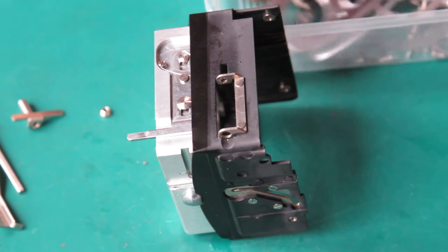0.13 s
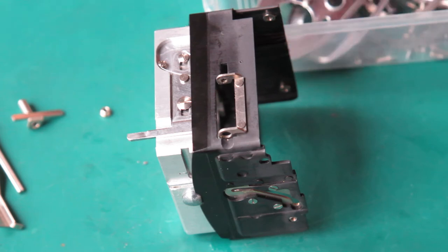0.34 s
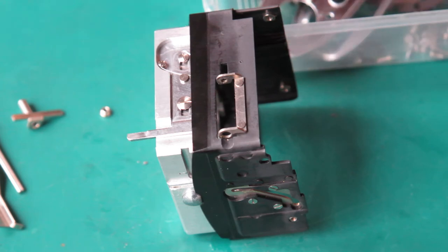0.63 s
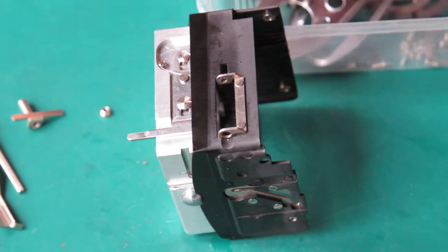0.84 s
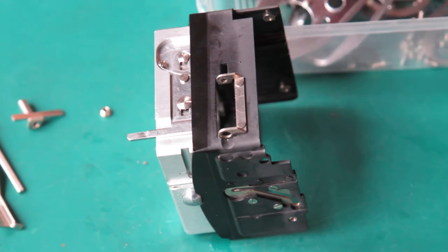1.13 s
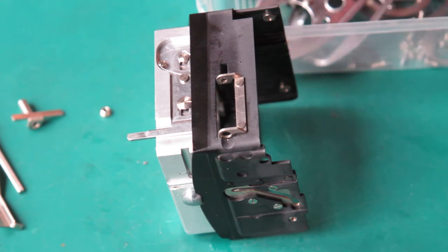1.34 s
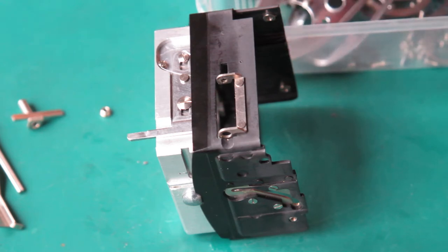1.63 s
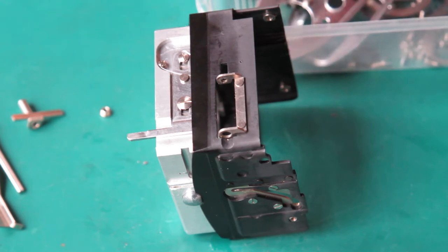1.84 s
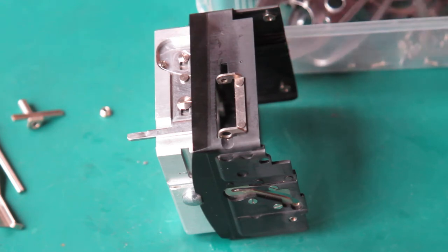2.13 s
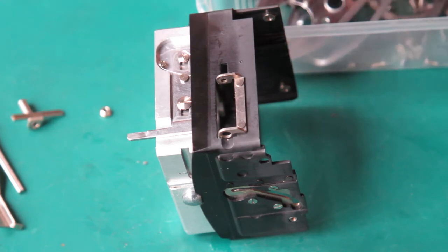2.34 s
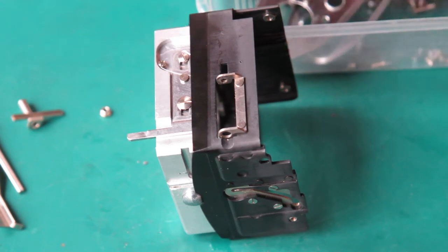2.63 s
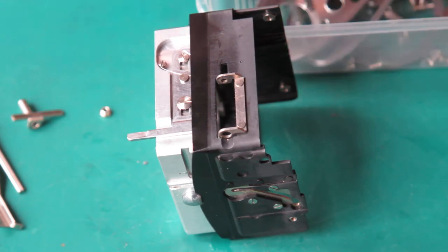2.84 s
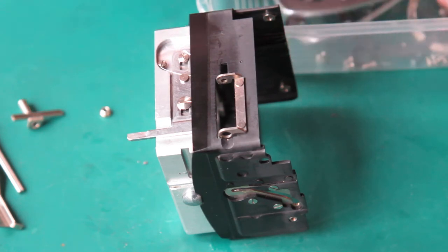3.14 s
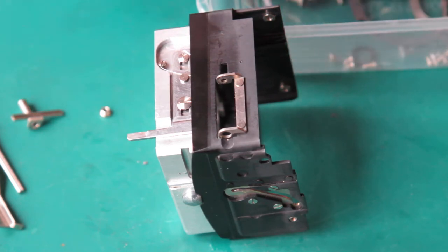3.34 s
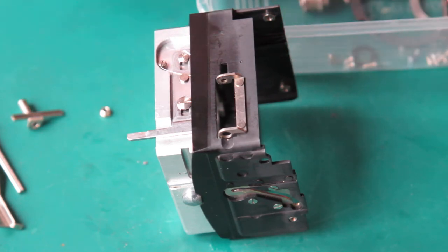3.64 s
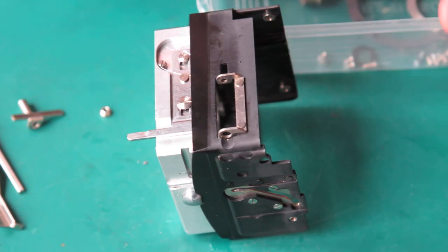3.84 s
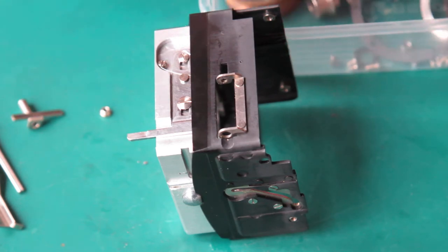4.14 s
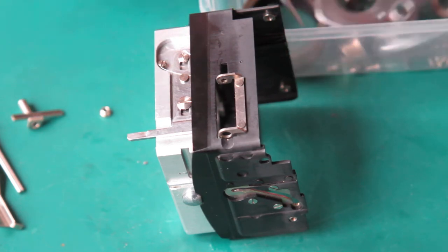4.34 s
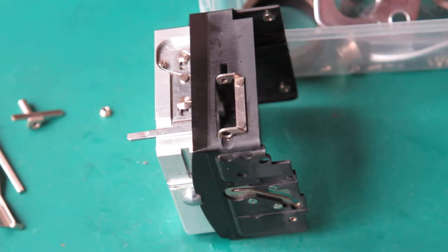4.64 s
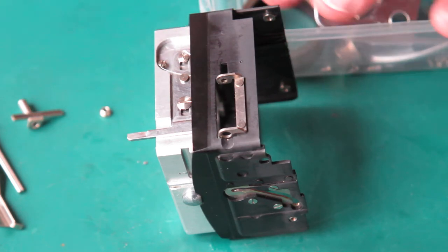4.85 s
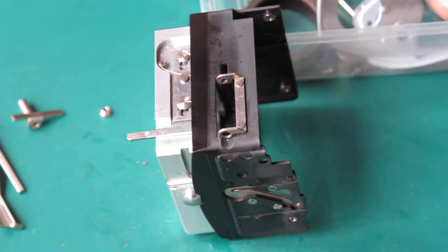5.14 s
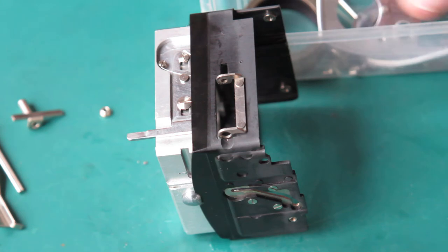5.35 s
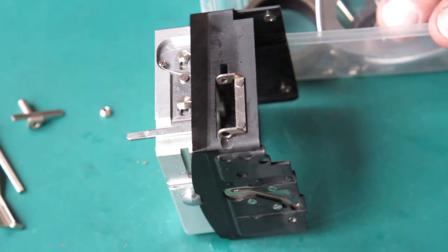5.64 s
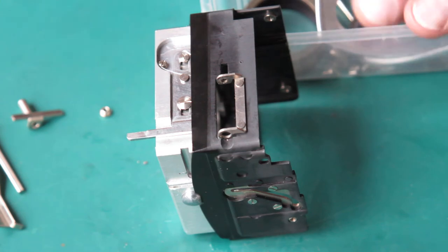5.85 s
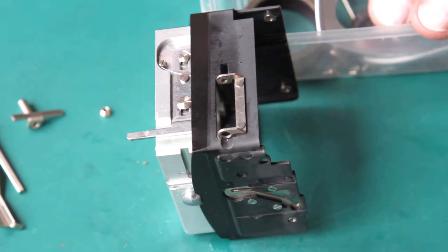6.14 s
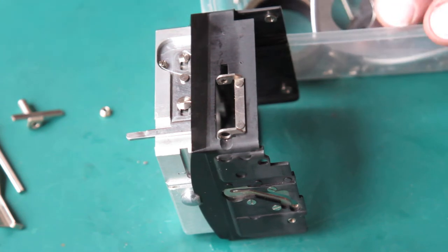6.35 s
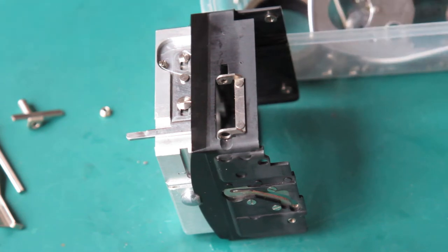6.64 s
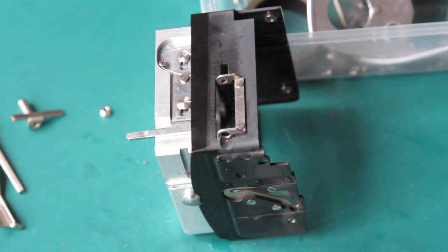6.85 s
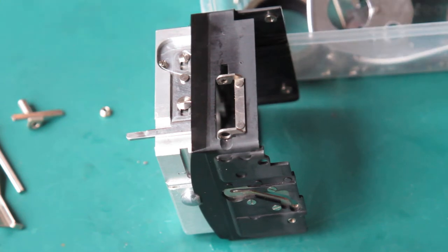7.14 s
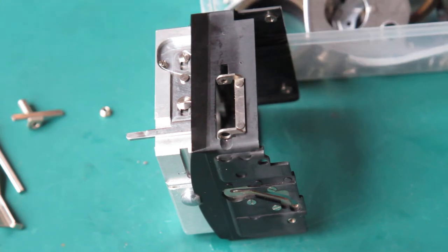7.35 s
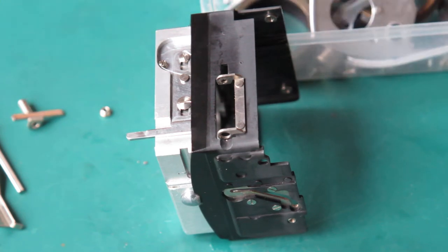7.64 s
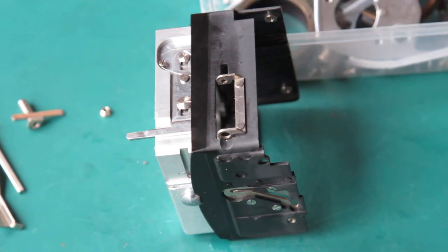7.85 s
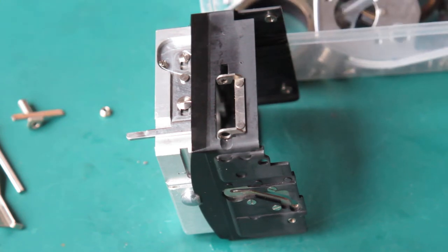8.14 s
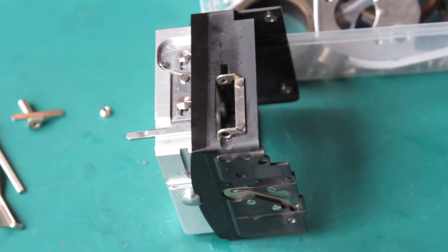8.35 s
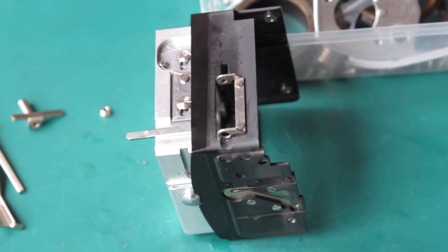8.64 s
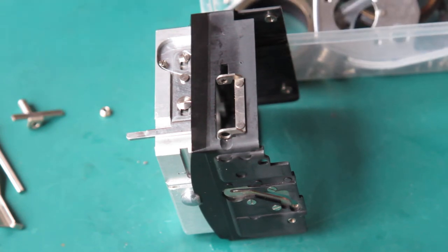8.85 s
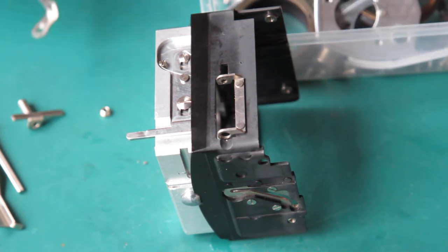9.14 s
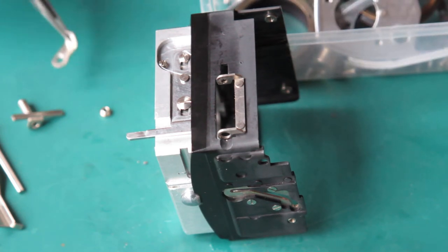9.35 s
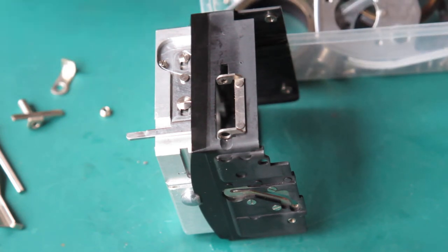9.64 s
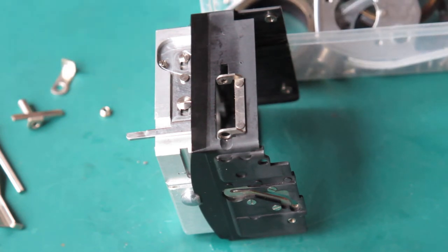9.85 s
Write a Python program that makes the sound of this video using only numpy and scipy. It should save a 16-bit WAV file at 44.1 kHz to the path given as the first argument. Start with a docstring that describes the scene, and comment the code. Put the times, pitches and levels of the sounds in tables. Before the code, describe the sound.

Small metal hardware is sorted by hand in a plastic tray on a workbench, picked up closely in stereo. Irregular bouts of crisp clinking and chattering are broken by short gaps, hard single clacks and hollow tray thumps. Later come a couple of strong rakes, then sparse ticks and soft scrapes. Finally a barely audible whistle leads to a tiny metal part dropping, its bounces deadened at once. Low room rush throughout, with short dense reflections.

```python
"""Fingers rummage through screws, washers and stamped metal parts in a plastic tray; a low hum wavers
throughout. From the start the heap rattles in bouts of random touches, over single clacks and the short modes
of struck parts. Later a few soft scrapes of rough noise swell and fade, the last near 9 s; the stray ticks stop
at 9.3 s. A small lug then rings with a thin gliding tone as it falls, and lands on the bench mat: three quick,
damped noise bursts. A small room adds dense echoes to everything but the hum."""
import sys
import numpy as np
from scipy import signal
from scipy.fft import rfft, irfft, next_fast_len
from scipy.io import wavfile
from scipy.ndimage import uniform_filter1d

SR = 44100
rng = np.random.default_rng(int(sys.argv[2]) if len(sys.argv) > 2 else 0)


def file_out(sig):
    """Save sig as 16-bit WAV at sys.argv[1]."""
    # one column per channel
    cols = np.atleast_2d(sig).T
    # limit, then scale
    lim = np.clip(cols, -1, 1)
    pcm = np.round(lim * 32767).astype(np.int16)
    wavfile.write(sys.argv[1], SR, pcm)


N = 440118
TIME = np.arange(N) / SR   # s

# common colour of the metal parts: (frequency [Hz], relative level [dB])
METAL_COLOUR = [(900, -35), (1550, -6.5), (1900, -18.5), (2600, -14), (3500, -1), (4600, -1.5), (6000, 1),
                (7100, 4.5), (8000, -2), (9500, -10), (12000, -19), (14000, -31.5), (16000, -51.5)]


def from_db(db):
    """Turn decibels into an amplitude factor."""
    return 10 ** (np.asarray(db) / 20)


def rms_one(x):
    """Scale a signal to an RMS of 1."""
    return x / np.sqrt(np.mean(x ** 2) + 1e-20)


def energy_one(x):
    """Scale each channel to a summed energy of 1."""
    return x / np.sqrt(np.sum(x ** 2, axis=-1, keepdims=True) + 1e-20)


def add(out, s, sound):
    """Mix a sound in at time s."""
    at = min(max(round(s * SR), 0), N - 1)
    out[..., at:at + sound.shape[-1]] += sound[..., :N - at]


def convolve(x, response):
    """Filter each channel with an impulse response, cut to the scene's length."""
    return signal.oaconvolve(np.atleast_2d(x), np.atleast_2d(response), axes=-1)[:, :N]


def colour(points, size=4096):
    """Causal (minimum-phase) impulse response with the given spectrum."""
    hz, db = np.transpose(points)
    grid = np.maximum(np.arange(size // 2 + 1) * SR / size, 1)
    spectrum_db = np.interp(np.log(grid), np.log(hz), db)
    # folding the cepstrum forward in time makes the response causal
    cepstrum = irfft(np.log(from_db(spectrum_db)))
    cepstrum[1:size // 2] *= 2
    cepstrum[size // 2 + 1:] = 0
    return irfft(np.exp(rfft(cepstrum)))[:size // 2]


def stereo_noise(side_db, size):
    """White noise in the middle, plus side noise with opposite signs left and right."""
    mid, side = rng.standard_normal((2, size))
    return mid + from_db(side_db) * side * np.array([[1], [-1]])


def contact(t60, side_db, size=3000):
    """One touch: a crowd of close modes, heard as noise, that all die away together; energy 1."""
    decay = from_db(-60 * TIME[:size] / t60)
    return energy_one(stereo_noise(side_db, size) * decay)


def touch(t60, ring_db, count=7, size=2000):
    """Metal meets metal: a crack plus a few short modes that belong to this one part; energy 1."""
    part_colour_db = 4.5   # typical random departure from the common metal colour
    t = TIME[:size]
    hz = rng.uniform(1400, 13000, (count, 1, 1))
    # each mode's phase differs between left and right
    phase = 2 * np.pi * rng.random((count, 1, 1)) + 0.71 * rng.standard_normal((count, 2, 1))
    life = .028 * 2 ** rng.uniform(-1, 1, (count, 1, 1))   # t60 of each mode, s
    modes = np.sum(from_db(-60 * t / life) * np.sin(2 * np.pi * hz * t + phase), axis=0)
    blow = contact(t60, side_db=-8.0, size=size) + from_db(ring_db) * energy_one(modes)
    points = [(f, db + part_colour_db * rng.standard_normal()) for f, db in METAL_COLOUR]
    own_colour = colour(points, size=512)
    return energy_one(signal.fftconvolve(blow, own_colour[None], axes=-1)[:, :size])


def pushing(times):
    """How hard the heap is stirred: every push swells, sags as the fingers ease off, then settles."""
    # finger movements: (start [s], kind, length [s], rattle level [dB] before sag and mix)
    pushes = [(0.002, "jab", 0.26, -31.5), (0.057, "push", 0.14, -26), (0.313, "push", 0.15, -31),
              (0.756, "push", 0.13, -31), (1.354, "push", 0.034, -30), (1.495, "jab", 0.036, -37),
              (1.686, "push", 0.073, -31.5), (2.089, "jab", .13, -28.5), (2.236, "jab", 0.13, -40),
              (2.433, "rake", 0.14, -28), (2.582, "jab", 0.16, -32.5), (2.862, "push", 0.37, -28.5),
              (3.132, "jab", 0.19, -34.5), (3.535, "rake", 0.13, -31), (3.723, "push", 0.15, -36),
              (3.89, "jab", 0.12, -32), (4.064, "push", 0.3, -33), (4.303, "jab", 0.14, -25.5),
              (4.698, "jab", 0.31, -34.5), (5.04, "jab", 0.33, -42.5), (5.155, "jab", 0.02, -26),
              (5.395, "rake", 0.15, -31), (5.793, "jab", 0.19, -37.5), (5.869, "jab", 0.25, -33.5),
              (6.192, "push", 0.082, -33), (6.323, "push", 0.21, -38.5), (6.491, "rake", 0.051, -22.5),
              (6.743, "rake", 0.14, -37.5), (7.166, "rake", 0.11, -21), (7.309, "push", 0.049, -23),
              (7.533, "push", 0.027, -34), (7.644, "push", 0.043, -24.5), (7.722, "jab", 0.14, -32),
              (8.024, "jab", 0.23, -51), (8.222, "rake", 0.16, -40.5), (9.021, "jab", 0.044, -37.5)]
    # time each kind of movement takes to swell: kind -> time [s]
    swell_s = {"jab": .007, "push": .018, "rake": .062}
    swell_from_db = -20.5   # start of a push relative to its full strength
    sag_db_per_s, settle_db_per_s = 5.5, 227
    resting_db, hand_leaves_s = -62.5, 9.3   # stray ticks while the hand lies in the tray
    effort_db = np.where(times < hand_leaves_s, resting_db, -np.inf)
    for start, kind, length, db in pushes:
        age = times - start
        rise_db = swell_from_db * np.clip(1 - age / swell_s[kind], 0, 1)
        fall_db = sag_db_per_s * age + settle_db_per_s * np.maximum(age - length, 0)
        push_db = np.where(age > 0, db + rise_db - fall_db, -np.inf)
        effort_db = np.maximum(effort_db, push_db)   # the strongest push wins
    return from_db(effort_db) + 1e-12


def stirring(metal_db, tray_db, per_s, spread_db, thinning, count=240):
    """The heap shifts under the fingers: many parts touch at random, and every touch also jolts the tray."""
    # how much the parts bear on the plastic: (time [s], level [dB] of tray against metal, before the mix)
    bearing = [(0.2, -9.5), (0.85, -16.5), (2.15, -19), (3.65, -8), (4.1, -13), (6.6, -10), (7.75, -13.5)]
    parts_moving, handover_s = 10, .02   # parts that move at once, and how often a new one joins in
    parts = [touch(t60=.03, ring_db=2.0) for k in range(count)]
    walls = [contact(t60=.02, side_db=-18, size=1000) for k in range(count)]
    times = rng.uniform(0, N / SR, int(per_s * N / SR))
    effort = pushing(times)
    # gentle stirring makes fewer touches, down to single ticks
    chance = (effort / effort.max()) ** np.clip(thinning, 0, 1)
    happens = rng.random(len(times)) < chance
    spread = np.minimum(rng.exponential(1, len(times)), 3)
    sizes = rms_one(from_db(spread_db * spread))
    # rarer touches are each made stronger, so the average power follows the effort
    sizes = sizes * effort * np.sqrt(SR / (per_s * chance))
    jolts = sizes * from_db(np.interp(times, *np.transpose(bearing)))
    # each part chatters briefly with its own resonances, then another takes over
    newest = (times / handover_s).astype(int)
    which = (newest + rng.integers(0, parts_moving, len(times))) % count
    metal, tray = np.zeros((2, 2, N))
    for i in np.flatnonzero(happens):
        add(metal, times[i], sizes[i] * parts[which[i]])
        add(tray, times[i], jolts[i] * walls[which[i]])
    return from_db(metal_db) * metal, from_db(tray_db) * tray


def clacks(metal_db, tray_db, gap_s, second_db):
    """A part lands with a hard crack, the bench throws it back a few milliseconds later, and the tray shakes."""
    # single clacks: (time [s], metal level [dB] before metal_db, where it lands)
    hits = [(0.009, -24.5, "floor"), (0.0579, -12, "heap"), (0.103, -4.5, "top"), (0.135, -9.5, "heap"),
            (0.4068, -11.5, "heap"), (0.417, -16, "heap"), (0.4686, -15, "wall"), (0.809, -23, "floor"),
            (0.831, -18, "wall"), (0.8822, -17.5, "top"), (0.96, -29, "wall"), (1.1732, -33.5, "top"),
            (1.446, -16.5, "heap"), (1.502, -22.5, "top"), (1.6527, -18, "wall"), (1.727, -20.5, "wall"),
            (1.774, -20, "heap"), (2.0861, -16.5, "wall"), (2.108, -12, "wall"), (2.1525, -11.5, "heap"),
            (2.364, -16.5, "wall"), (2.466, -27, "wall"), (2.6862, -11, "wall"), (2.7646, -18, "wall"),
            (2.876, -18.5, "top"), (2.8943, -16, "wall"), (3.0585, -9.5, "top"), (3.0888, -15, "wall"),
            (3.264, -13.5, "wall"), (3.38, -30, "wall"), (3.438, -27.5, "wall"), (3.4728, -22.5, "wall"),
            (3.5938, -15.5, "wall"), (3.713, -16.5, "floor"), (3.769, -23, "floor"), (3.934, -13.5, "wall"),
            (4.224, -16, "heap"), (4.2622, -14, "floor"), (4.3169, -8.5, "wall"), (4.391, -14.5, "heap"),
            (4.697, -27.5, "floor"), (4.714, -27, "heap"), (4.7503, -17, "wall"), (4.824, -14.5, "floor"),
            (4.8818, -18.5, "floor"), (4.982, -21.5, "wall"), (5.1555, -10, "wall"), (5.1788, -8.5, "heap"),
            (5.427, -20.5, "floor"), (5.496, -16, "heap"), (5.769, -21, "floor"), (5.893, -16.5, "floor"),
            (5.915, -16.5, "wall"), (6.0982, -13.5, "wall"), (6.333, -17.5, "heap"), (6.488, -13, "heap"),
            (6.829, -25, "heap"), (6.902, -21, "heap"), (7.147, -24, "wall"), (7.2341, -10, "top"),
            (7.465, -24, "wall"), (7.499, -20.5, "wall"), (7.6586, -14.5, "heap"), (7.7843, -9.5, "heap"),
            (7.8056, -10.5, "heap"), (7.859, -16, "wall"), (8.295, -18.5, "wall"), (8.314, -17.5, "wall"),
            (8.376, -15.5, "floor"), (8.761, -28.5, "wall"), (8.8295, -25.5, "heap"),
            (8.8623, -23.5, "wall"), (9.039, -16, "wall"), (9.088, -25, "wall")]
    # how hard a clack shakes the tray: landing place -> level [dB] added to the crack, before tray_db
    lands_on = {"floor": -10, "wall": -17, "heap": -23, "top": -33}
    metal, tray = np.zeros((2, 2, N))
    for s, crack, place in hits:
        edge = touch(t60=.015, ring_db=-5.0)
        add(metal, s, from_db(crack + metal_db) * edge)
        second_s = s + gap_s * rng.uniform(0.38, 2.2)
        reflection = touch(t60=0.095, ring_db=-6.0)
        add(metal, second_s, from_db(crack + metal_db + second_db) * reflection)
        shake = contact(t60=0.079, side_db=-17.5)
        add(tray, s, from_db(crack + lands_on[place] + tray_db) * shake)
    return metal, tray


def ringing(level_db, size=16000):
    """Struck things sound their own modes; what they lean on shifts pitch and mix a little on every blow."""
    # modes of the things that ring: part -> (frequency [Hz] before the shift, relative level [dB], t60 [s])
    part_modes = { "lug": [(6430, 4.5, 0.06), (7260, -1, 0.29), (7350, 2.5, 0.13), (11600, -9, 0.051)],
                  "bolt": [(7560, -1.5, 0.023)], "pin": [(5650, 5, 0.021)], "plate": [(6450, 10.5, 0.085),
                  (7310, 8, 0.15)], "bracket": [(2510, 6.5, 0.028), (3310, 3.5, 0.044)],
                  "shim": [(10565, 7, 0.08)], "washer": [(8340, 11, 0.06), (12130, 7.5, 0.05)],
                  "small washer": [(11630, 0, .07)], "clip": [(9417, 0, .06)], "spacer": [(4191, 0, .06)],
                  "lever": [(3502, 0, .07)], "nut": [(6530, 7, 0.038)], "tray wall": [(1580, 6, 0.022)],
                  "tray rim": [(2090, -2.5, 0.042)], "tray": [(180, -7, 0.06), (276, 0, 0.07),
                  (505, 2, 0.045)], "tray floor": [(330, -6, .02), (530, 0, .022)],
                  "screw": [(7320, -1.5, 0.022)]}
    # blows: (time [s], part, level [dB] before mode level and level_db)
    blows = [(.06, "small washer", -33), (.134, "tray floor", -23), (0.138, "shim", -25.5),
             (.207, "pin", -27), (.835, "small washer", -38), (1.449, "tray wall", -36.5),
             (1.719, "tray wall", -35), (2.125, "nut", -27), (2.203, "clip", -29), (2.203, "screw", -21),
             (2.688, "tray", -33.5), (2.899, "tray rim", -29), (3.012, "bolt", -12.5), (3.028, "bolt", -11),
             (3.059, "small washer", -30), (3.068, "nut", -27), (3.209, "screw", -9.5),
             (3.265, "spacer", -29.5), (3.439, "clip", -43), (3.771, "tray rim", -25),
             (4.003, "nut", -30.5), (4.052, "bolt", -28), (4.108, "lever", -25), (4.11, "shim", -36.5),
             (4.2635, "tray floor", -17.5), (4.265, "tray", -33), (4.316, "plate", -43),
             (4.339, "plate", -30), (4.366, "washer", -45), (4.371, "tray", -34), (4.713, "spacer", -27),
             (4.823, "tray floor", -27.5), (4.876, "tray", -37.5), (4.981, "tray rim", -36),
             (5.156, "tray floor", -30), (5.156, "bracket", -26.5), (5.179, "bracket", -30.5),
             (5.185, "washer", -42), (5.199, "nut", -30), (5.544, "washer", -43), (5.772, "tray rim", -35),
             (5.916, "bracket", -26), (5.917, "pin", -23), (6.068, "screw", -26), (6.234, "washer", -46),
             (6.274, "nut", -23), (6.375, "nut", -23), (6.376, "bolt", -19), (6.859, "nut", -36),
             (7.231, "tray", -34), (7.245, "shim", -31.5), (7.272, "tray", -33), (7.36, "washer", -42),
             (7.559, "screw", -22), (7.572, "lug", -29.5), (7.574, "screw", -9),
             (7.686, "small washer", -33), (7.751, "lug", -30), (7.788, "tray", -36.5),
             (7.805, "tray wall", -32), (7.861, "plate", -32), (8.234, "lug", -45.5),
             (8.353, "bolt", -23.5), (8.377, "tray wall", -27.5), (8.377, "tray rim", -25),
             (8.829, "screw", -13), (8.862, "screw", -10.5), (8.86, "lug", -33), (9.04, "lug", -30),]
    out, t = np.zeros(N), TIME[:size]
    rise = 1 - np.exp(-t / .0003)   # soft onset
    for s, part, db in blows:
        for hz, mode_db, t60 in part_modes[part]:
            height_db = level_db + db + mode_db + rng.standard_normal()
            shifted = hz + rng.standard_normal() / t60   # tightly held parts shift most
            decay = from_db(height_db - 60 * t / t60)
            swing = rise * decay * np.sin(2 * np.pi * shifted * t)
            # the air follows the speed of the swing
            add(out, s, np.diff(swing) / (2 * np.sin(np.pi * hz / SR)))
    return out


def slides(grain_db):
    """Sliding metal catches on countless tiny bumps; the scrape swells and fades."""
    # soft slides of one part over the others: (start [s], length [s], level [dB] before the swell)
    scrapes = [(6.672, 0.22, -47), (8.05, .13, -51), (8.667, 0.19, -51), (8.812, 0.15, -46.5)]
    out = np.zeros((2, N))
    for s, length, db in scrapes:
        size = int(length * SR)
        grain = from_db(grain_db * rng.standard_normal(size))
        bumps = rms_one(stereo_noise(side_db=-2, size=size) * grain)
        add(out, s, from_db(db) * np.hanning(size) * bumps)
    return convolve(out, energy_one(colour(METAL_COLOUR)))


def falling_lug():
    """The falling lug rings: a faint, thin sine tone edges up, then slides down just before the lug lands."""
    # gliding tone of the falling lug: (time [s], frequency [Hz], level [dB])
    glide = [(9.24, 4105, -64.5), (9.305, 4110, -71), (9.335, 4130, -62), (9.46, 3840, -63)]
    s, hz, db = np.transpose(glide)
    phase = 2 * np.pi * np.cumsum(np.interp(TIME, s, hz)) / SR
    sounding = (TIME > s[0]) * (TIME < s[-1])
    return from_db(np.interp(TIME, s, db)) * sounding * np.sin(phase)


def drop(level_db, t60, tail_db, tail_t60):
    """The lug clacks and bounces on the bench mat, which damps it at once; a faint diffuse tail follows."""
    # impacts on the mat: (time [s], level [dB] before level_db)
    landings = [(9.4659, -9), (9.469, -4.5), (9.4783, -13.5)]
    # colour of the impacts: (frequency [Hz], relative level [dB])
    mat_colour = [(1500, -14.5), (4000, 3), (5000, 0.5), (7100, 1.5), (8300, -9), (16000, -42)]
    out = np.zeros((2, N))
    for s, db in landings:
        clack = contact(t60, side_db=-6.0) + from_db(tail_db) * contact(tail_t60, side_db=-4.0)
        add(out, s, from_db(level_db + db) * clack)
    return convolve(out, energy_one(colour(mat_colour)))


def room(x, wet_db, first_echo_s, size=16384):
    """Direct sound, then dense echoes from the bench and the near walls, which favour no band over another."""
    room_t60 = 0.25   # s
    t = TIME[:size]
    tail = from_db(-60 * t / room_t60) * (t > first_echo_s)
    echoes = energy_one(stereo_noise(side_db=-6.5, size=size) * tail)
    response = (t == 0) + from_db(wet_db) * echoes
    # the inverse of the smoothed spectrum evens out the bands
    power = uniform_filter1d(np.mean(np.abs(rfft(response)) ** 2, axis=0), size=24)
    hz = np.linspace(1, SR / 2, len(power))
    even = colour(np.column_stack([hz, -10 * np.log10(power)]))
    return convolve(x, energy_one(convolve(response, even)))


def microphones(x):
    """Each band leans left or right in level only, with no delay between the sides."""
    # how the two microphones hear the bench: (frequency [Hz], left minus right [dB])
    lean = [(700, 3), (3500, -0.5), (5200, -2.5), (6500, -9.5), (7400, -11), (8500, -1.5), (10300, 9),
            (11800, 13.5)]
    size = next_fast_len(N)
    hz, db = np.transpose(lean)
    grid = np.linspace(1, SR / 2, size // 2 + 1)
    lean_db = np.interp(np.log(grid), np.log(hz), db)
    return irfft(rfft(x, size) * from_db(np.array([lean_db, -lean_db]) / 2), size)[:, :N]


def hum():
    """Low rush of the room: coloured noise whose level wavers, a little stronger on the left."""
    # colour of the rush: (frequency [Hz], relative level [dB])
    hum_colour = [(20, -18), (60, -20), (115, -3.5), (236, -14), (400, -14), (607, -20.5), (988, -20.5),
                  (1440, -26.5), (6920, -35.5), (16000, -58.5)]
    # how the rush wavers: (time [s], level [dB] before the left/right offset)
    waver = [(.6, -55), (1.9, -51.5), (6, -52), (6.9, -49), (8.3, -54.5), (9.9, -50)]
    air = rms_one(convolve(stereo_noise(side_db=-9, size=N), colour(hum_colour)))
    sides_db = np.array([[1.5], [-1.2]])   # left, right
    return from_db(np.interp(TIME, *np.transpose(waver)) + sides_db) * air


def scene():
    """Mix the bench sounds in the room, lean them left and right, and lay the hum beneath."""
    # colour of the plastic tray: (frequency [Hz], relative level [dB])
    tray_colour = [(90, -23.5), (170, -2), (225, -12), (275, -1), (510, 2.5), (850, -1.5), (1600, -0.5),
                   (3300, 5), (5000, -2), (9000, -50.5)]
    rattle, rumble = stirring(metal_db=-0.5, tray_db=7.5, per_s=750, spread_db=2.5, thinning=.55)
    cracks, knocks = clacks(metal_db=13.0, tray_db=28.0, gap_s=.003, second_db=0.0)
    tray = convolve(rumble + knocks, energy_one(colour(tray_colour)))
    metal = rattle + cracks + slides(grain_db=1) + ringing(level_db=4.0)
    lug = drop(level_db=3.0, t60=0.011, tail_db=-11, tail_t60=0.1) + falling_lug()
    bench = room(metal + tray + lug, wet_db=-5.0, first_echo_s=0.0026)
    return microphones(bench) + hum()


def record(dry):
    """The highest peaks are rounded, then a steep low-pass cuts the top."""
    top, cutoff_hz = 0.6, 15300   # top: amplitude ceiling of the rounding
    rounded = top * np.tanh(dry / top)
    low_pass = signal.ellip(10, .1, 90, cutoff_hz, fs=SR, output="sos")
    return signal.sosfilt(low_pass, rounded)


dry = scene()
out = record(dry)
file_out(out)
```